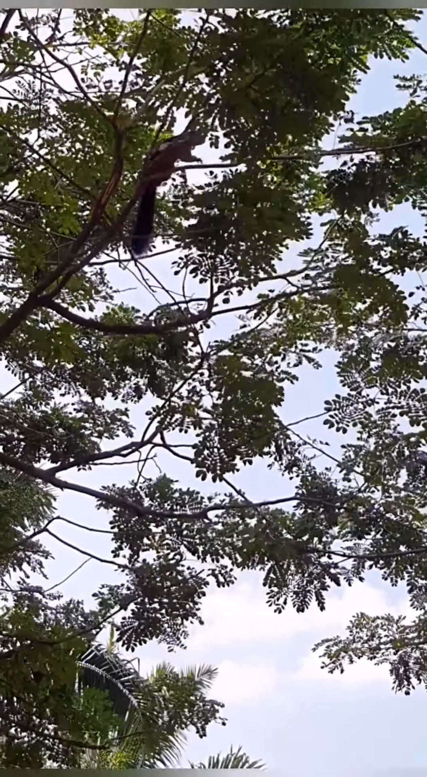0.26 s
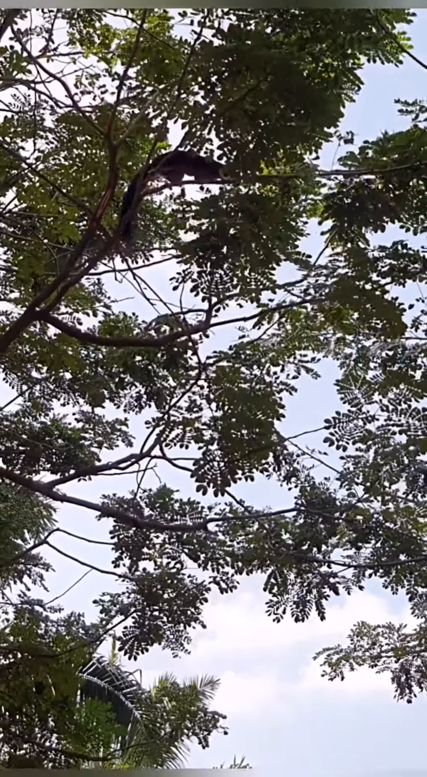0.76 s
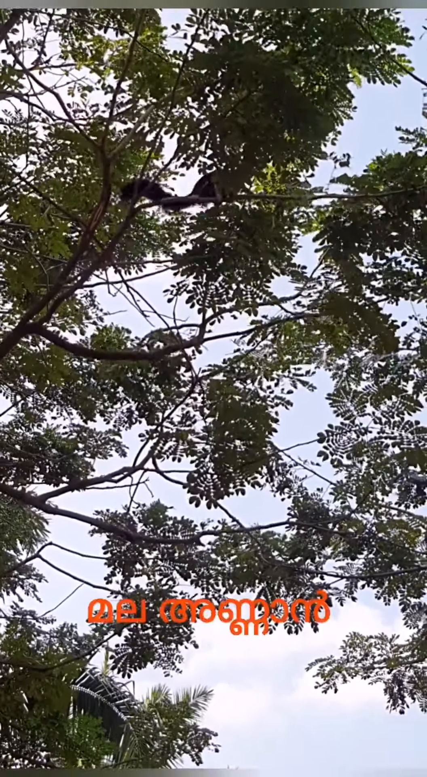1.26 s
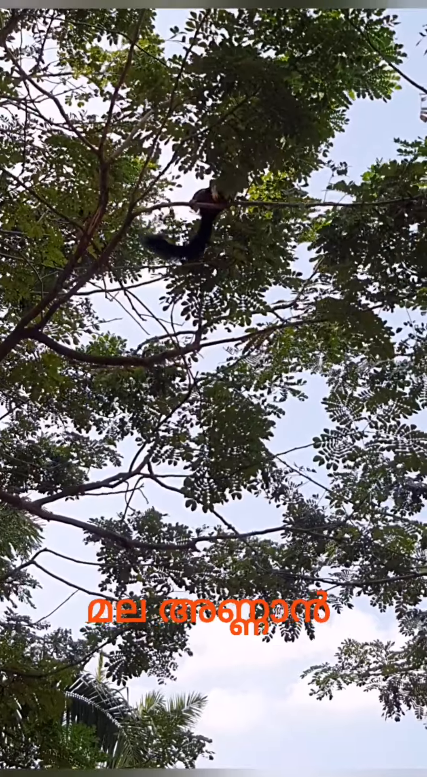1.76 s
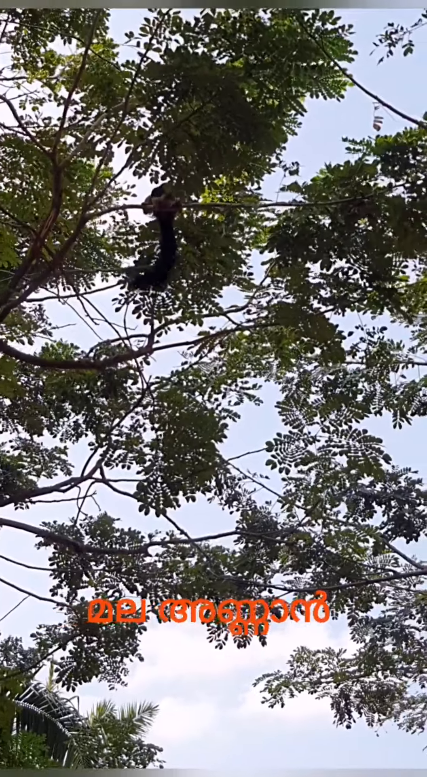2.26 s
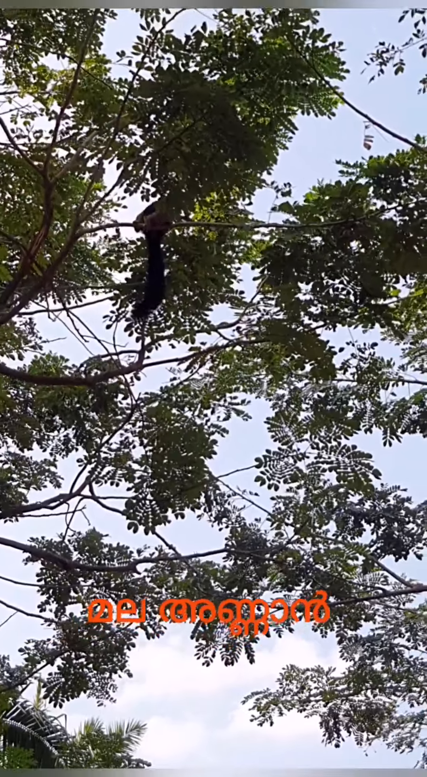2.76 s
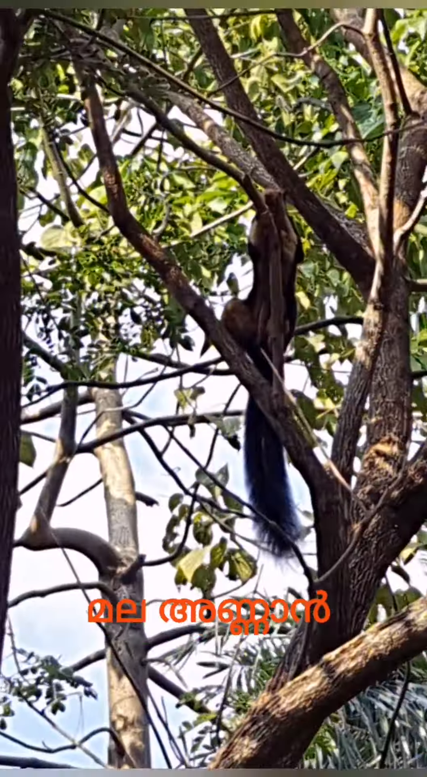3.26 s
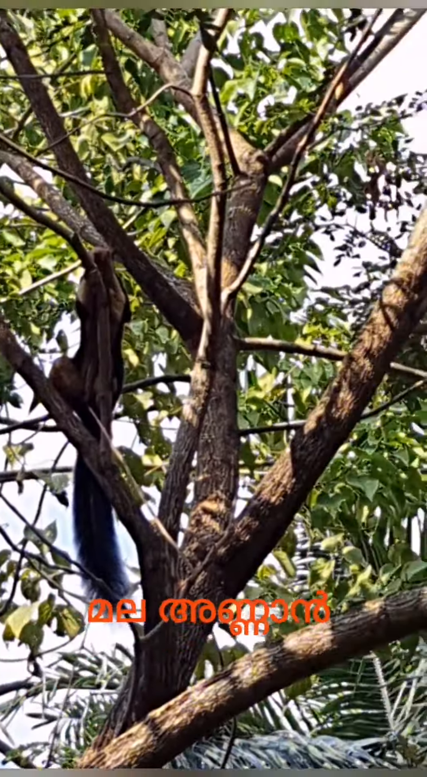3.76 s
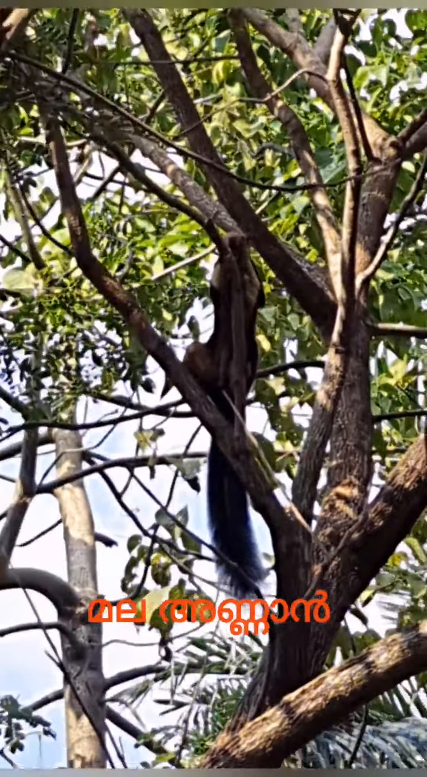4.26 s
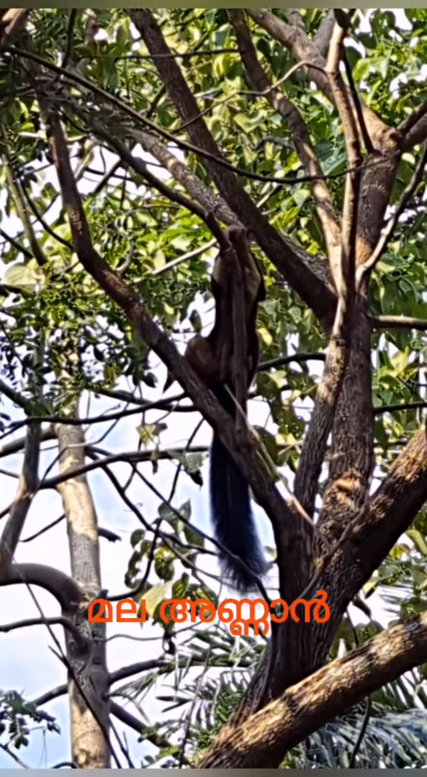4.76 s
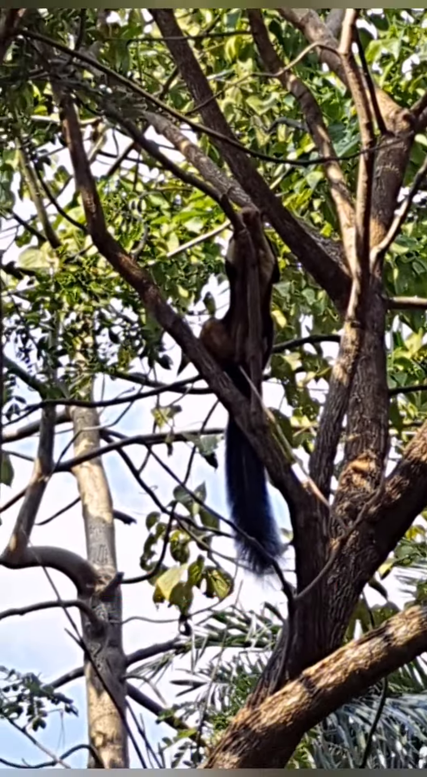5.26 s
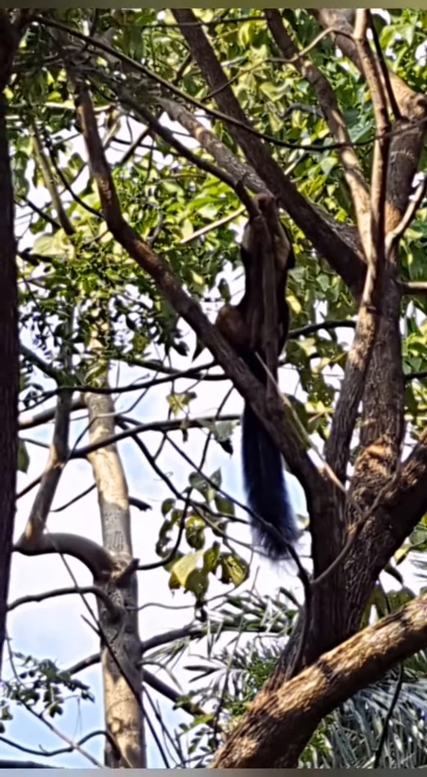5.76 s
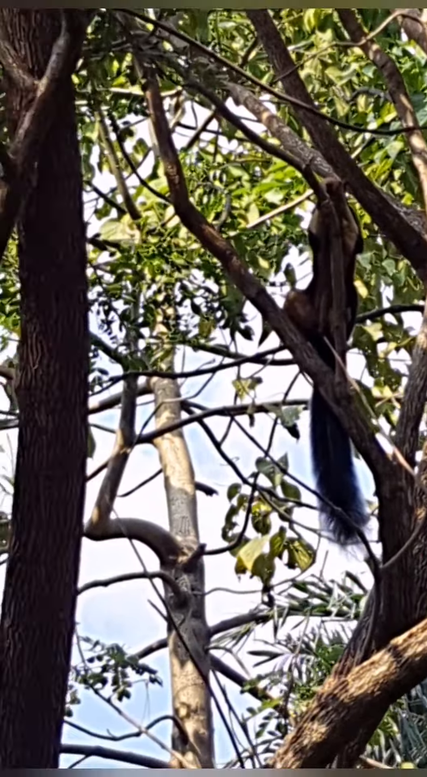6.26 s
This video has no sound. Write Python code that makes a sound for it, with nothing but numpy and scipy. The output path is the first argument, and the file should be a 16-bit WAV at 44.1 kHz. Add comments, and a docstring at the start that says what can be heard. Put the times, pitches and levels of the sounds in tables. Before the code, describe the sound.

A soft rush of leaves and distant road sits behind a squirrel's machine-like chatter, over twenty dry barks per second. It slackens into a small bird's gliding whistle and a string of sharp, downward-bending squeaks, some lower and whining. Everything sinks away and drops out briefly, then snaps back for a piercing squeak and a faster, more forceful second rattle. Open-air microphone at a distance, with short diffuse reflections from branches.

```python
"""A giant squirrel scolds from a tree over the soft rush of a roadside grove, which is band-filtered noise.
First comes a long rattle of short falling barks: harmonics and pulsed noise, shaped by throat and jaw.
A small bird whistles gliding pure tones, and high squeaks with few overtones follow.
The level then sinks almost to silence for a moment and cuts back in; a last squeak leads to a second rattle.
Branches and leaves scatter the voices as echoes and a diffuse tail."""
import sys
import numpy as np
from scipy import signal
from scipy.fft import rfft, irfft
from scipy.io import wavfile

SR = 44100
rng = np.random.default_rng(int(sys.argv[2]) if len(sys.argv) > 2 else 0)


def bounce(signal):
    """Save signal as a 16-bit WAV file at the path given by the first command-line argument."""
    frames = np.transpose(np.atleast_2d(signal))
    limited = np.clip(frames, -1, 1)
    pcm = np.round(limited * 32767).astype(np.int16)
    wavfile.write(sys.argv[1], SR, pcm)


N = 287532
TOP_HZ = 12300  # upper limit of the sound; overtones of squeaks may start up to a minor third (1.2 times) higher


def undb(db):
    """Level to amplitude: twenty decibels are a factor of ten."""
    return 10 ** (np.asarray(db) / 20)


def unit(x):
    """Normalization: scale to a root mean square of one."""
    return x / np.sqrt(np.mean(x ** 2) + 1e-18)


def follow(points, x):
    """Linear interpolation: the value at x of a curve given by (position, value) points."""
    return np.interp(x, *np.transpose(points))


def shape(points, hz):
    """Frequency response: gain of a (frequency_hz, level_db) spectrum, interpolated over log frequency."""
    f, db = np.transpose(points)
    return undb(np.interp(np.log(hz + 1), np.log(f), db))


def colour(x, points):
    """Linear filtering: multiply the sound's spectrum by a (frequency_hz, level_db) response."""
    frequencies = np.fft.rfftfreq(len(x), 1 / SR)
    return irfft(rfft(x) * shape(points, frequencies), len(x))


def wander(t, rate, size=512):
    """Band-limited random motion: chance values, rate per second, joined by lines; spread near one."""
    return 1.096 * np.interp(t * rate, np.arange(size), rng.standard_normal(size))


def add(out, start, x):
    """Superposition: mix a sound in at its starting time in seconds."""
    i = max(int(start * SR), 0)
    out[i:i + len(x)] += x[:len(out) - i]


def grove(flicker_db=1, count=9):
    """Broadband noise of distant road and stirring leaves: octave bands flicker independently in level."""
    # long-term spectrum of the rush: frequency_hz, relative_level_db (per Hz)
    rush_spectrum = [(25, -14), (65, 0), (130, -8.5), (300, -9.5), (600, -7), (1150, -5.5), (1900, -7.5),
                     (3200, -10.5), (4500, -17.5), (6000, -17.5), (8500, -23.5), (10500, -26.5),
                     (11300, -46), (12300, -56)]
    level_db = -35
    t = np.arange(N) / SR
    rush = 0
    for hz in 40 * 2 ** np.arange(count):
        octave = [(hz / 2, -40), (hz * .75, 0), (hz * 1.33, 0), (hz * 2, -40)]
        band = colour(rng.standard_normal(N), octave)
        rush = rush + band * undb(flicker_db * wander(t, 14))
    return unit(colour(rush, rush_spectrum)) * undb(level_db)


def bark(pitch_hz, length, db, treble_db, rough, jaw_db, jitter=0.0717, jitter_rate=1400,
         rest_hz=1440, smear=1.83, release=0.36, size=2048, count=20):
    """Source and filter: falling harmonics and pulsed air excite the resonances of throat and jaw."""
    # resonances of throat and open mouth: frequency_hz, level_db
    resonances = [(350, -29.5), (600, -2.5), (900, -7), (1300, -2), (1850, -12), (2620, -3.8), (3050, -6),
                  (3600, -1), (5100, 0), (5900, -13), (7600, -3), (9100, -10), (10450, -8), (11000, -49.5)]
    # air pressure through one bark: share_of_length, level_db
    pressure = [(0, -6), (.2, -3), (.55, 2.5), (.75, -3), (1, 6.5)]
    fall, droop = .25, .47  # shares by which the pitch sinks evenly, and ever faster
    rasp, lift = 1.18, 0.49  # gain of air in a fully rough bark; power by which resonances follow pitch
    t = np.arange(size) / SR
    u = np.minimum(t / length, 1)
    hz = pitch_hz * (1 - fall * u - droop * u ** 2)
    # the folds beat less evenly as they slacken
    unsteady = jitter * rough * (0.37 + u) * wander(t, jitter_rate)
    phase = 2 * np.pi * np.cumsum(hz * (1 + unsteady)) / SR
    # a tense, high bark shortens the throat and raises all but its topmost resonances
    throat = [(f * (pitch_hz / rest_hz) ** lift if f < 9500 else f, g) for f, g in resonances]
    # the higher the harmonic, the more it depends on pressure
    k = np.arange(1, count + 1)[:, None]
    harmonic_hz = k * hz
    push_db = follow(pressure, u)
    push_share = np.clip(harmonic_hz / 3000 - .6, 0, 1.6)
    gains = shape(throat, harmonic_hz) * (harmonic_hz < TOP_HZ) * undb(push_db * push_share)
    start_phases = smear * rng.standard_normal((count, 1))
    voice = np.sum(gains * np.cos(k * phase + start_phases), axis=0)
    # air rasps through the folds once a cycle, mostly above the lowest harmonics
    pulsed_noise = rng.standard_normal(size) * (1 + np.cos(phase))
    puffs = colour(pulsed_noise, [(2400, -5), (3500, -1.5)])
    air = unit(colour(puffs, throat)) * undb(push_db)
    attack = np.clip((t - .0008) / .0008, 0, 1)
    envelope = attack * np.clip((1 - u) / release, 0, 1)
    # the jaw is tuned to the second harmonic of the starting pitch
    jaw = [(ratio * pitch_hz, share * jaw_db) for ratio, share in [(1.35, 0), (1.75, 1), (2.1, 1), (2.45, 0)]]
    mouth = jaw + [(5300, 0), (6800, treble_db)]
    sound = colour((voice + rasp * rough * air) * envelope, mouth)
    # db is the rms level over the bark's own length
    return unit(sound) * np.sqrt(length * SR / size) * undb(db)


def rattle(count=48):
    """Effort of phonation: barks in quick succession, higher, louder, brighter and cleaner with effort."""
    # the two rattles: start_s, end_s, level_db (of a bark at no effort)
    bouts = [(0.0072, 2.16, -19.4), (4.9562, 6.52, -18)]
    # tempo of the barking, which mostly slows as each rattle tires: time_s, barks_per_s
    tempo = [(0, 24.11), (.7, 22.81), (1.4, 20.92), (1.79, 20.62), (1.96, 16.25), (2.08, 18.4),
             (4.956, 27.51), (5.4, 24.02), (5.75, 23.79), (6.45, 22.26)]
    # how hard the squirrel calls, bursting out and then mostly flagging: time_s, effort (0-1)
    effort_curve = [(0, 0.53), (.8, .42), (1.4, 0.31), (1.96, 0.18), (2.14, .42), (4.955, 1), (5.0, .72),
                    (5.3, 0.75), (5.6, 0.48), (6.5, .38)]
    # a bark at no effort, and what full effort adds to it
    bark_hz, effort_hz = 1268.3, 394.1  # starting pitch
    bark_s, effort_s = .0162, .0045  # length: tired barks are curt
    effort_db = 4  # level
    base_treble_db, effort_treble_db = -1.5, 6.5
    base_jaw_db, effort_jaw_db = -2.5, 11.5  # the jaw gapes at high effort and feeds the second harmonic
    base_rough, effort_clears = 0.868, 0.71  # roughness 0-1, which effort takes away
    # chance spread from bark to bark
    pitch_spread, length_spread, rough_spread, level_spread_db = .02, .07, .18, 0.5
    out = np.zeros(N)
    for start, end, db in bouts:
        for pitch, length, level, grit in rng.standard_normal((count, 4)):
            if start > end:
                break
            effort = follow(effort_curve, start)
            rough = base_rough - effort_clears * effort + rough_spread * grit
            sound = bark(pitch_hz=(bark_hz + effort_hz * effort) * (1 + pitch_spread * pitch),
                         length=(bark_s + effort_s * effort) * (1 + length_spread * length),
                         db=db + effort_db * effort + level_spread_db * level,
                         treble_db=base_treble_db + effort_treble_db * effort,
                         rough=np.clip(rough, 0, 1),
                         jaw_db=base_jaw_db + effort_jaw_db * effort)
            add(out, start, sound)
            start += 1 / follow(tempo, start)
    return out


def canopy(x, near_db, far_db, far_t60, cover=1, near_t60=0.11, build=0.02, count=30):
    """Multiple scattering: branches return separate early echoes, the foliage beyond a diffuse tail."""
    # how well the foliage scatters each pitch: frequency_hz, level_db
    leaf_scatter = [(600, -9), (1400, -6), (2600, -7.5), (3500, -2.5), (5000, 1.5), (6000, 4.5), (7500, 1),
                    (11000, 2)]
    t = np.arange(SR) / SR
    branches = np.zeros(SR)
    delays_s = rng.uniform(.002, .016, count)
    branches[(delays_s * SR).astype(int)] = rng.standard_normal(count)
    branches = branches * undb(-60 * t / near_t60)
    leaves = rng.standard_normal(SR) * undb(-60 * t / far_t60) * (1 - np.exp(-t / build))
    # branches and leaves scatter short waves best
    branches = colour(unit(branches), [(1300, 2.5), (2600, -8.5), (4500, 5), (7500, 6.5)])
    leaves = colour(unit(leaves), leaf_scatter)
    response = (undb(near_db) * branches + undb(far_db) * leaves) / np.sqrt(SR)
    return x + signal.fftconvolve(x * cover, response)[:N]


def glide(hz, quaver, edge=0.00066):
    """Frequency modulation: phase of a gliding tone quavering by a share of its pitch, and its soft gate."""
    t = np.arange(len(hz)) / SR
    phase = 2 * np.pi * np.cumsum(hz * (1 + quaver * wander(t, 682))) / SR
    return phase, np.clip(np.minimum(t, t[-1] - t) / edge, 0, 1)


def bird(quaver=0.0017, gain_db=-2):
    """Pure tones: thin whistles from further off, each a single gliding sinusoid."""
    # one table for each whistle: time_s, pitch_hz, level_db (before gain_db)
    whistle_tracks = [
        [(2.035, 4740, -37), (2.05, 5230, -27), (2.09, 5000, -39), (2.13, 5300, -27), (2.16, 4570, -27),
         (2.2, 5200, -33), (2.23, 5300, -48), (2.36, 5300, -100)],
        [(4.185, 5290, -56), (4.2, 5140, -44), (4.23, 5240, -52)],
        [(4.35, 6240, -43), (4.38, 6570, -37), (4.402, 6740, -31.5), (4.425, 6540, -41), (4.45, 6800, -52),
         (4.53, 6660, -39)],
    ]
    out = np.zeros(N)
    for rows in whistle_tracks:
        s, hz, db = np.transpose(rows)
        t = np.arange(s[0], s[-1], 1 / SR)
        phase, gate = glide(np.interp(t, s, hz), quaver)
        level = undb(np.interp(t, s, db) + gain_db)
        add(out, s[0], gate * level * np.sin(phase))
    return out


def swell(u, db, loudest):
    """Amplitude envelope: gain through a squeak, up to its loudest moment, then down, evenly in decibels."""
    swell_db, wane_db = 14, 15.5
    peak = np.clip(loudest, .01, .99)
    return undb(db + np.interp(u, [0, peak, 1], [-swell_db, 0, -wane_db]))


def squeaks(quaver=0.0041, slack=0.024, count=6):
    """Resonant selection of overtones by the mouth; pitch bends to a held value and sinks unsteadily."""
    # one row for each squeak (two where the voice breaks): start_s, length_s, first_hz, held_hz, last_hz,
    # held_reached_share (of length), fall_power, fundamental_db, fundamental_peak_share (of length),
    # overtones_db, overtones_peak_share (of length)
    squeak_rows = [(2.392, 0.079, 4500, 3915, 3620, 0.29, 1.5, -17, 0.18, -16, 0.63),
                   (2.468, 0.043, 3600, 3430, 2450, 0.11, 1.4, -26.5, 0.22, -23, 0.9),
                   (2.607, 0.017, 4430, 4760, 4740, .7, 2, -31, .7, -26, 0.63),
                   (2.626, .04, 4870, 4570, 3000, 0.31, 2.4, -12, 0.29, -16, 0.075),
                   (2.768, 0.045, 5360, 5210, 4940, 0.44, 3.2, -49, .7, -27, 0.61),
                   (2.79, 0.031, 4600, 4470, 3100, .12, 1.4, -23, .3, -20, 0.62),
                   (2.867, .056, 2750, 3590, 3650, .8, 2, -26, 0.87, -59, .6),
                   (2.920, 0.09, 3266, 4645, 2720, .42, 1.9, -14, 0.17, -15, 0.53),
                   (3.015, .104, 1820, 1940, 1620, .38, 1.4, -25, 0.87, -20.5, 0.76),
                   (3.272, 0.046, 4650, 4570, 4300, 0.55, 1.6, -33, .3, -16, 0.46),
                   (3.2995, 0.026, 5140, 4750, 2790, 0.092, 1.3, -13, 0.056, -13.5, 0.62),
                   (3.491, 0.051, 4090, 4600, 2970, 0.54, 5, -20, 0.16, -31.5, 0.15),
                   (3.53, 0.0174, 3650, 3450, 2810, .2, 0.94, -41, 0.27, -25, 0.57),
                   (3.557, .08, 2300, 2120, 1980, 0.29, 1.5, -35, 0.17, -45, .15),
                   (3.63, 0.046, 2100, 1930, 1606, 0.21, 0.69, -26.5, 0.72, -38, 0.37),
                   (3.842, 0.041, 3350, 4740, 4100, 0.76, 2.5, -21.5, 0.3, -30, 0.31),
                   (3.875, 0.017, 4170, 3630, 2570, 0.22, 1, -25, 0.23, -21.5, 0.81),
                   (4.741, 0.055, 5760, 5115, 3080, 0.11, 1.56, -12, 0.1, -20, 0.36)]
    # how the narrowed mouth favours the overtones: frequency_hz, level_db
    narrow_mouth = [(3600, -14.5), (5600, -2), (7500, 0), (9300, -11), (10600, -20.5), (12000, -38)]
    # the higher a squeak is held, the purer: loss from one overtone to the next, per kHz above the lowest voice
    purity_db_per_khz, lowest_hz = 3, 1820
    out = np.zeros(N)
    k = np.arange(2, count + 1)[:, None]
    for start, length, first_hz, held_hz, last_hz, turn, power, low_db, low_at, high_db, high_at in squeak_rows:
        u = np.linspace(0, 1, int(length * SR))
        bend = np.maximum(1 - u / turn, 0)
        fall = np.maximum((u - turn) / (1 - turn), 0)
        hz = held_hz + (first_hz - held_hz) * bend ** 2 + (last_hz - held_hz) * fall ** power
        phase, gate = glide(hz, quaver + slack * fall ** 2)
        above_khz = (held_hz - lowest_hz) / 1000
        purity = undb(-purity_db_per_khz * above_khz * k)
        weights = shape(narrow_mouth, k * hz) * purity * (k * hz < 1.2 * TOP_HZ)
        weights = weights / (weights.max(axis=0) + 1e-9)  # the strongest overtone has gain one
        overtones = np.sum(weights * np.sin(k * phase), axis=0)
        low = swell(u, low_db, low_at) * np.sin(phase)
        high = swell(u, high_db, high_at) * overtones
        add(out, start, gate * (low + high))
    return out


def scene():
    """Superposition of squirrel and bird, scattered by the canopy, on the rush of the grove."""
    # how much of each bark goes into the foliage; less once the squirrel has come out along the branch,
    # and more again later: time_s, level_db
    foliage_share = [(0, 2.3), (1.45, 1.5), (1.75, 0.5), (2.15, -0.5), (4.96, 1), (5.2, 2.5), (6.5, 1)]
    barks = rattle()
    calls = squeaks() + bird()
    cover = undb(follow(foliage_share, np.arange(N) / SR))
    barking = canopy(barks, cover=cover, near_db=-9.0, far_db=-1.5, far_t60=0.32)
    piping = canopy(calls, near_db=-7.5, far_db=-3.5, far_t60=0.29)
    return (barking + piping + grove())[None]


def record(dry):
    """Amplitude modulation and low-pass filtering: the level sinks and cuts back in; the top is cut."""
    # the fade and the near-silent gap: time_s, gain_db
    fade = [(3.98, -3.5), (4.2, -6), (4.35, -9), (4.48, -12), (4.57, -16), (4.591, -64), (4.711, -53),
            (4.72, -2.5), (4.95, -4.5)]
    faded = dry * undb(follow(fade, np.arange(N) / SR))
    low_pass = signal.ellip(8, .2, 70, TOP_HZ, fs=SR, output="sos")
    return signal.sosfilt(low_pass, faded)


dry = scene()
out = record(dry)
bounce(out)
```